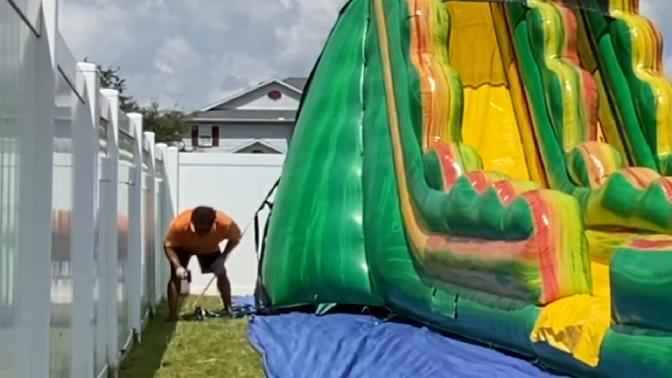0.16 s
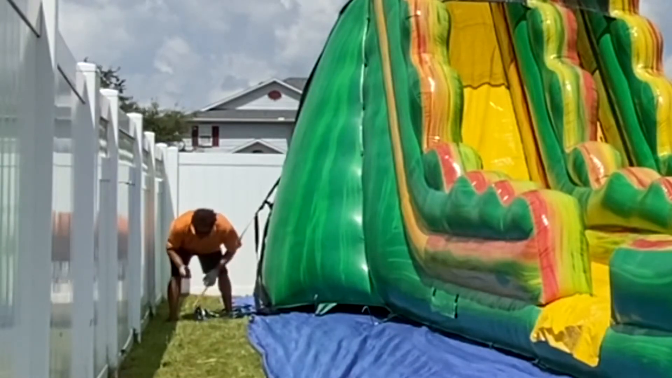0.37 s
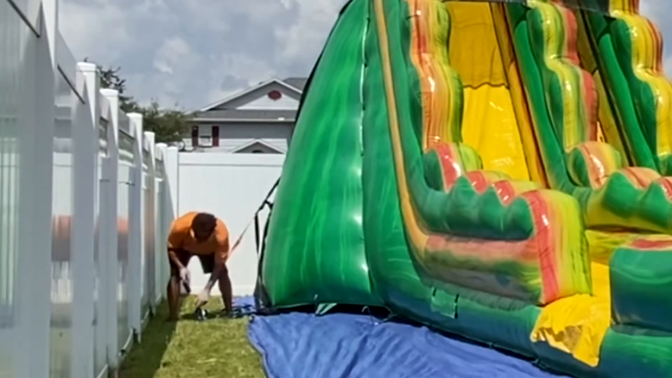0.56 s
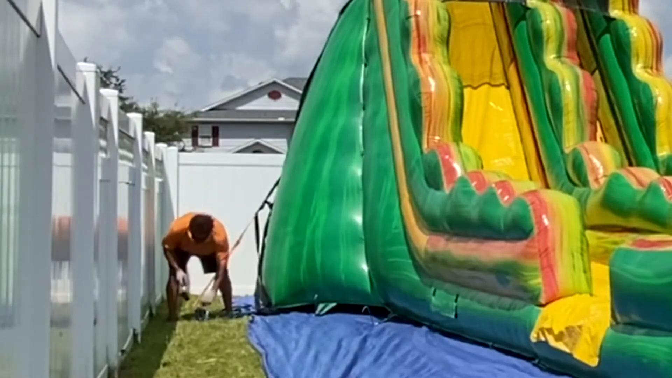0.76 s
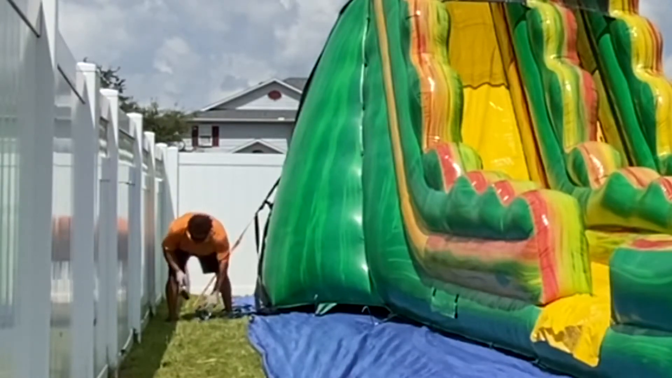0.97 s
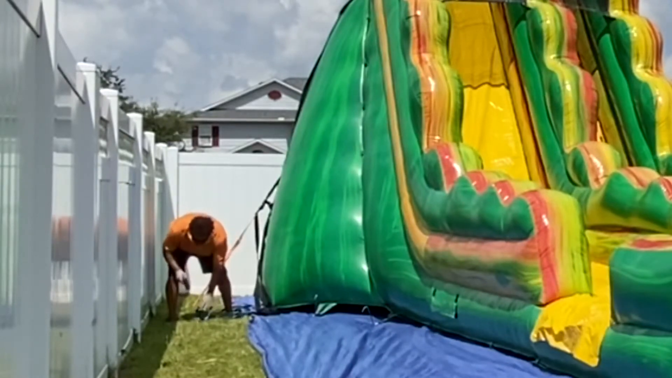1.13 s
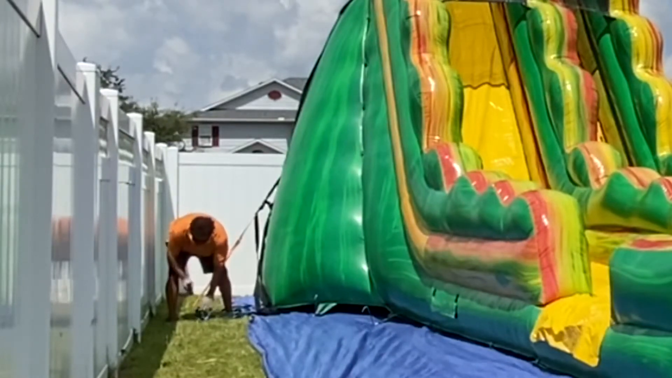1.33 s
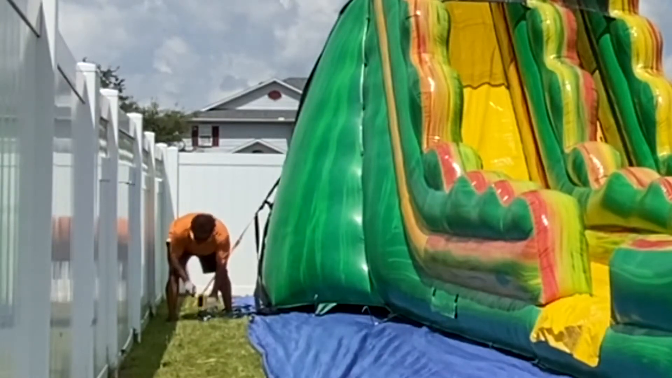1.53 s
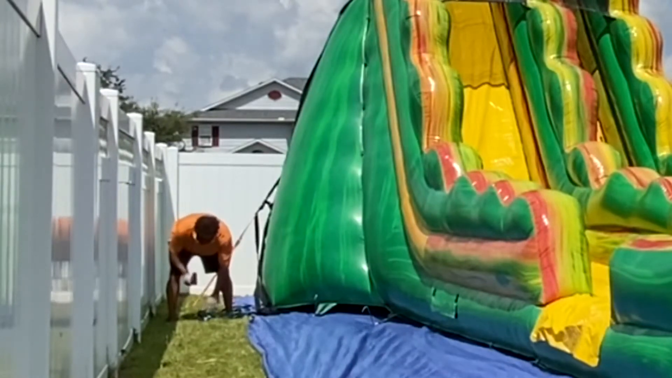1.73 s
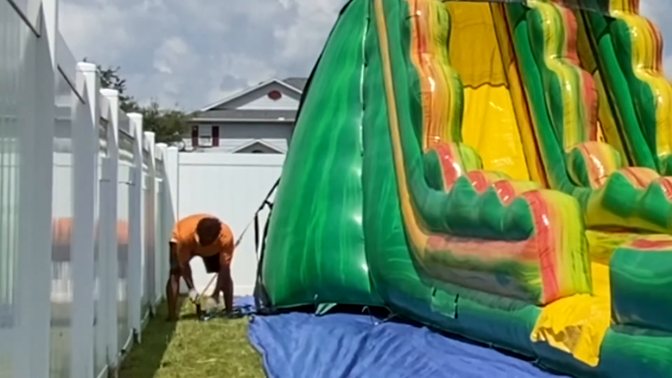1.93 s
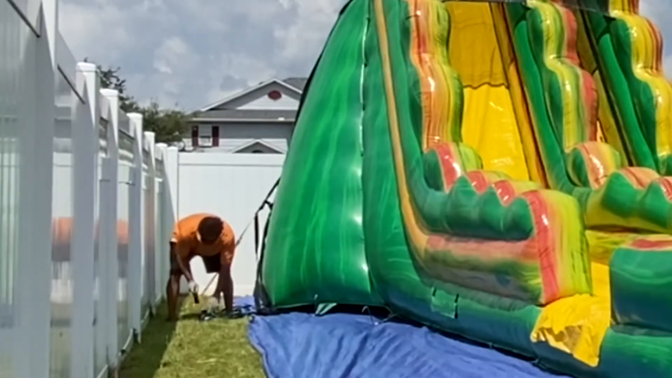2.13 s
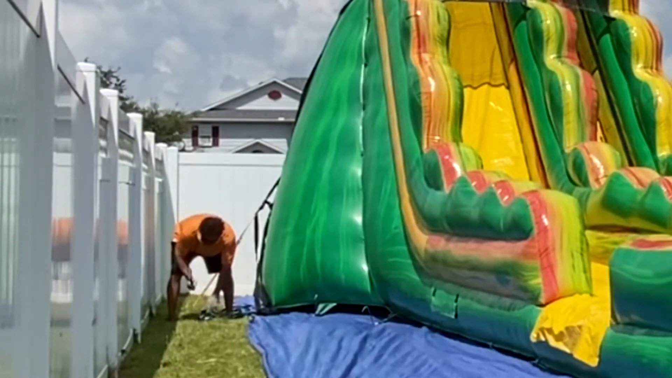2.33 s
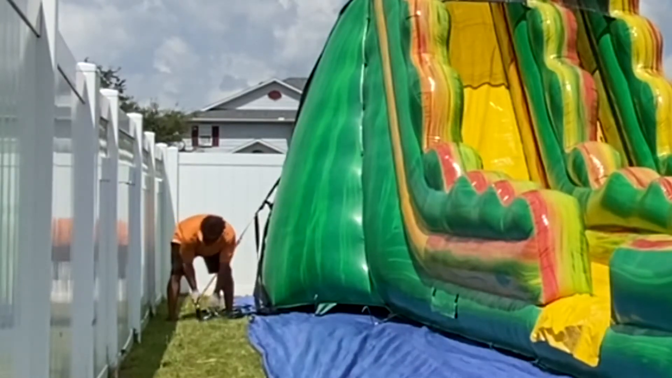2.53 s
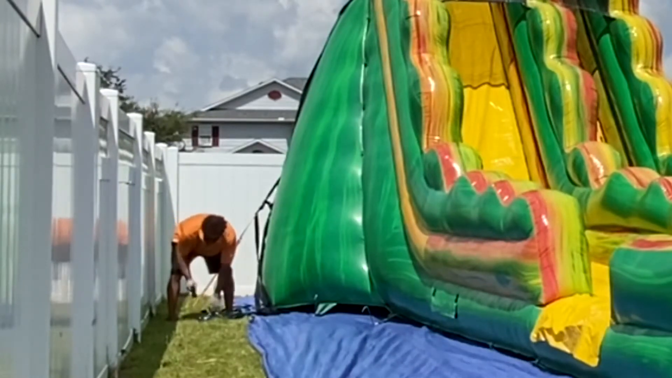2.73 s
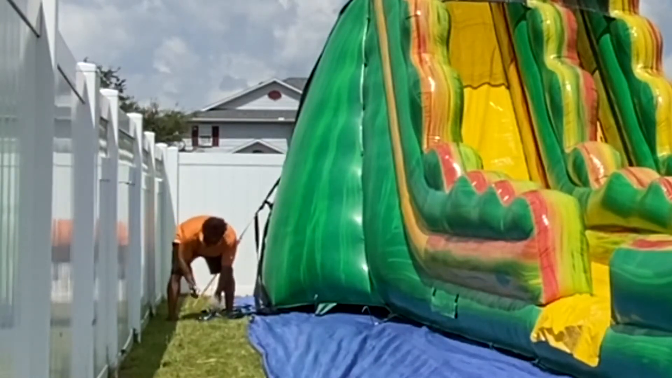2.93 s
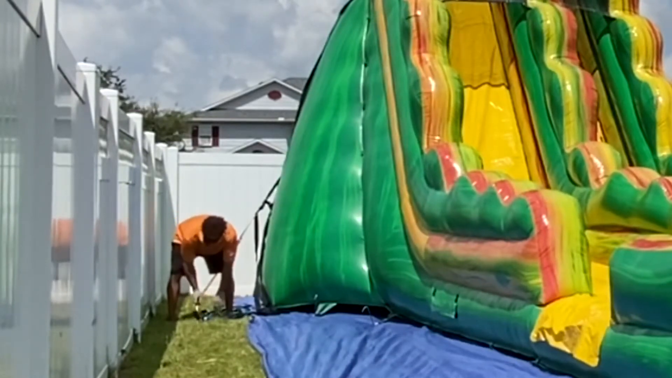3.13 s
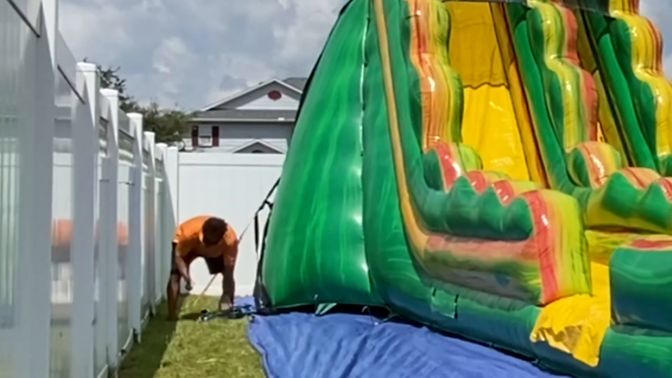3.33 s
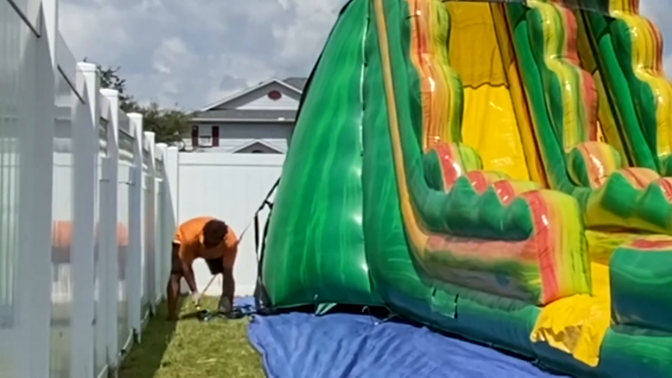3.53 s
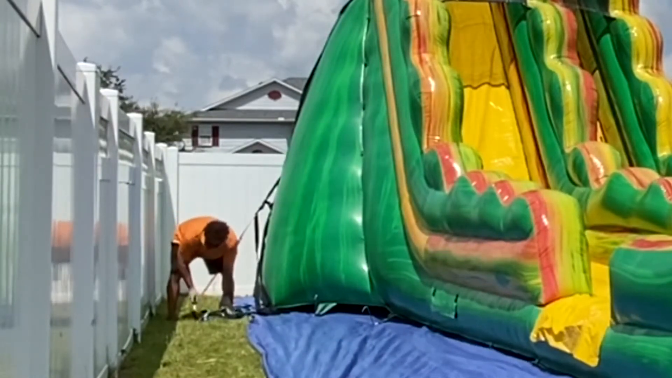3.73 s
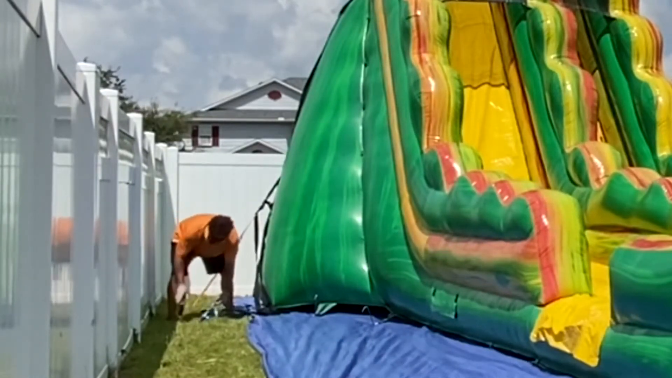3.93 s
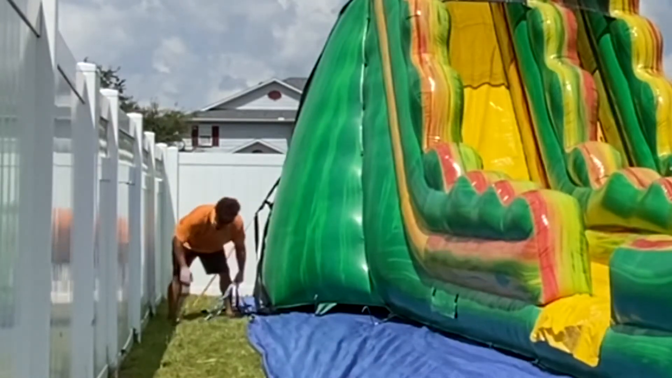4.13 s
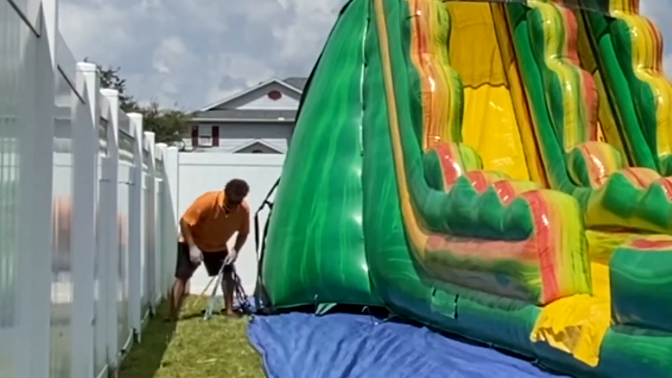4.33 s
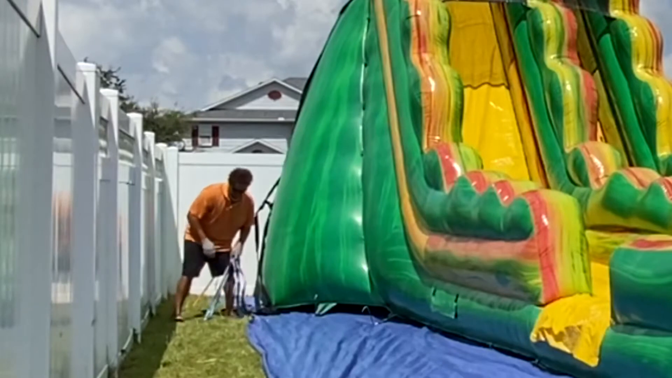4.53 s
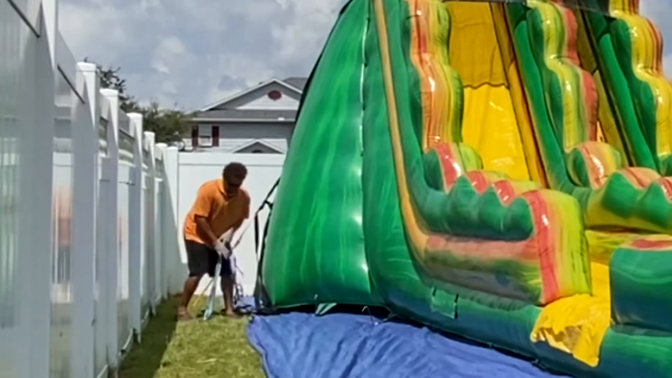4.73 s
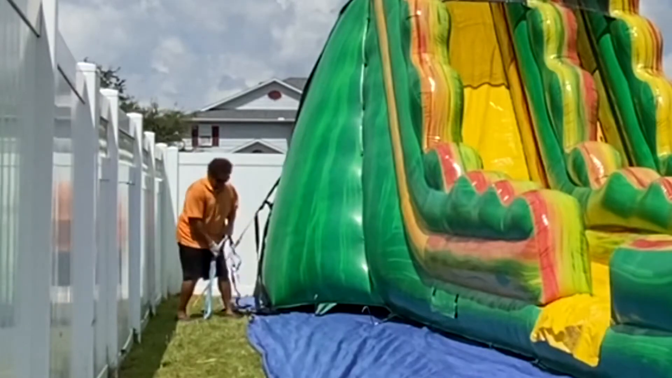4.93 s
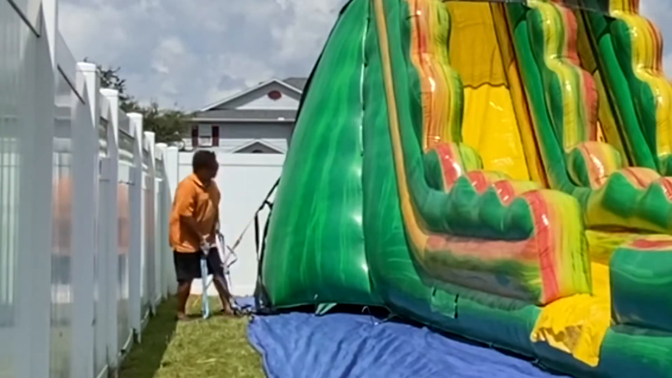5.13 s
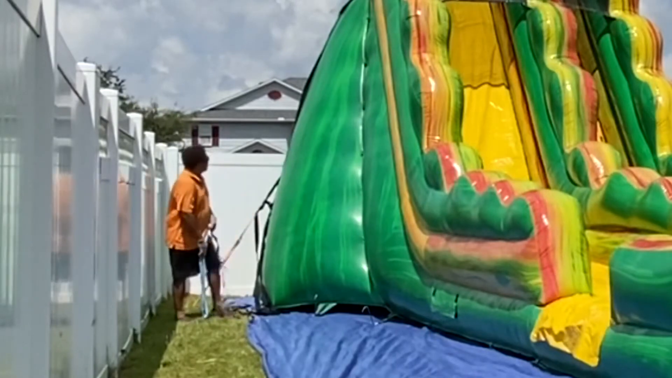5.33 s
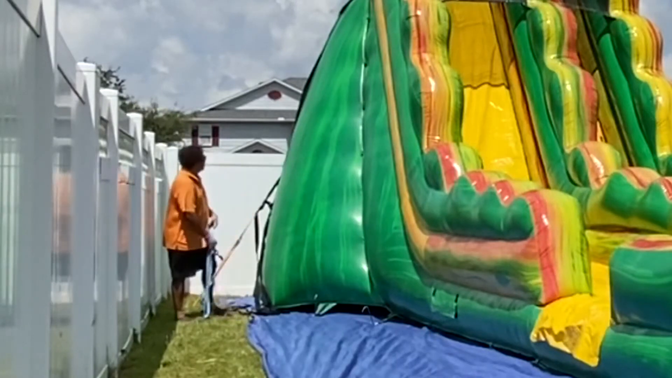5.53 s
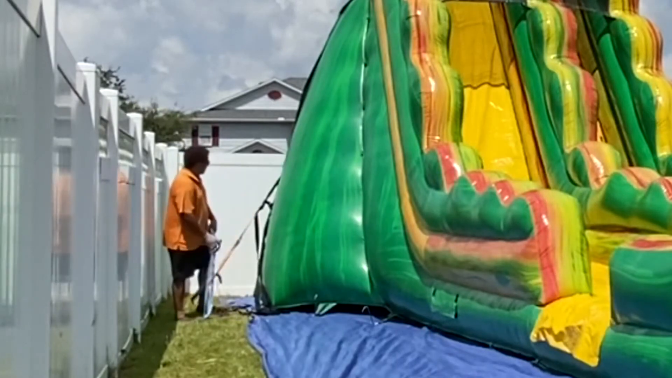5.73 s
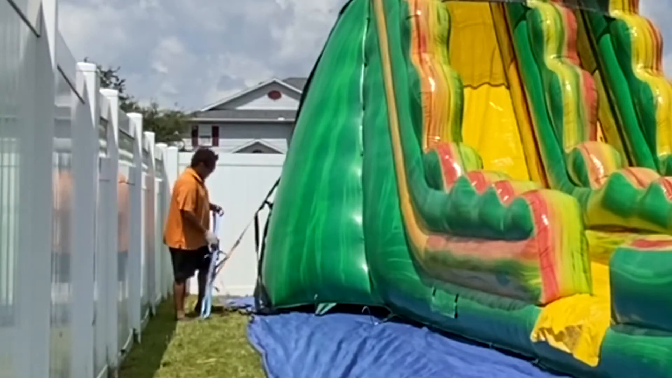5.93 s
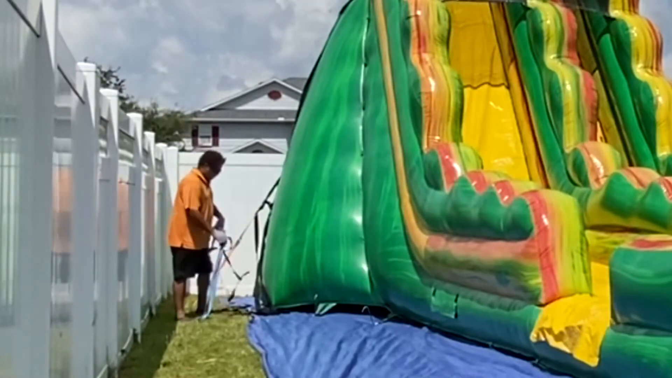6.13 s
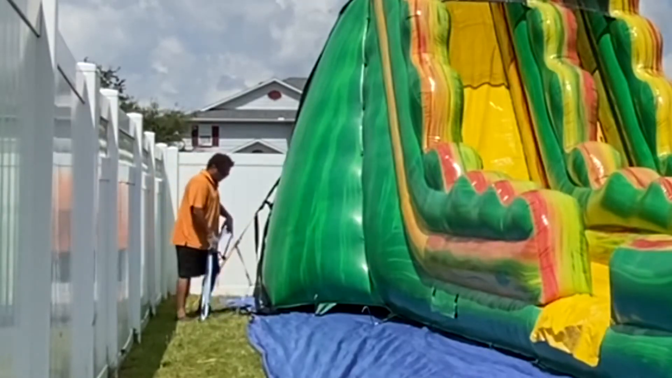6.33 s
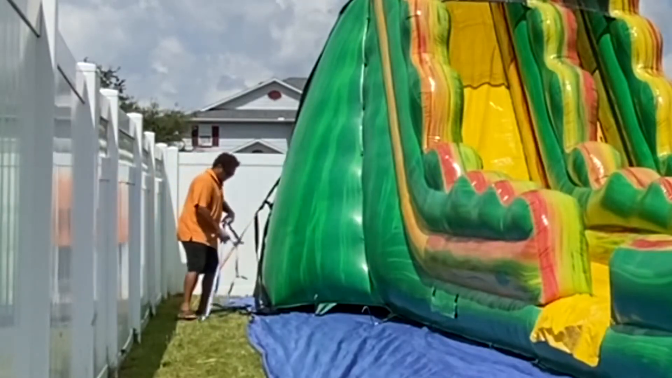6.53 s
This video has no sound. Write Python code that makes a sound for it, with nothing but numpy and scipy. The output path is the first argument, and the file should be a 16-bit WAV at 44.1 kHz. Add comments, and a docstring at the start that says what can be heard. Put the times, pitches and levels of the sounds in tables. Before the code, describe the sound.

Beside a droning inflatable blower, heavy booming knocks land about once a second, joined by sharp high steel clinks that ring shorter near the end.

```python
"""A slide's blower roars, hisses and hums throughout, by filtered noise and wavering sines, in a fenced lane.
The dying ring of a hammer blow on a steel stake opens the scene; the stake's modes ring as decaying sines.
Heavy, dull blows follow at a slow beat: noise cracks, body modes, a booming ground and shuddering panels.
From 1.4 s the hammer clinks on at a quicker beat, and the soil's growing grip shortens the main rings.
Fence and houses return the blows by early paths, scatter, a decaying tail and an echo."""
import sys
import numpy as np
from scipy import signal
from scipy.fft import rfft, irfft, next_fast_len
from scipy.io import wavfile
from scipy.ndimage import uniform_filter1d, map_coordinates

SR = 44100
rng = np.random.default_rng(int(sys.argv[2]) if len(sys.argv) > 2 else 0)


def output_pcm(signal):
    """Save a mono or channel-first signal as 16-bit PCM at the path in sys.argv[1].

    Samples are clipped to [-1, 1] before scaling.
    """
    pcm = np.clip(np.atleast_2d(signal).T, -1, 1) * 32767
    wavfile.write(sys.argv[1], SR, np.round(pcm).astype(np.int16))


N = 290619
T = np.arange(int(0.6 * SR)) / SR  # seconds from the start of one hit
SIDES = np.array([[1], [-1]])  # left, right


def amp(db):
    """Level law: decibels to amplitude gain."""
    return 10 ** (np.asarray(db) / 20)


def unit(x):
    """Power normalization: scale to rms 1."""
    return x / np.sqrt(np.mean(x ** 2) + 1e-20)


def burst(x):
    """Short-term power: scale each channel of a hit so that its loudest 20 ms have rms 1."""
    power = uniform_filter1d(x ** 2, size=882, axis=1)
    return x / np.sqrt(power.max(axis=1, keepdims=True) + 1e-20)


def along(points, hz):
    """Logarithmic frequency scale: interpolate (hz, value) points on it."""
    f, v = np.transpose(points)
    return np.interp(np.log(hz + 1), np.log(f + 1), v)


def wobble(rate):
    """Band-limited fluctuation: a smooth random curve with rate knots a second."""
    knots = rng.standard_normal(int(N * rate / SR) + 4)
    return map_coordinates(knots, [np.arange(N) * rate / SR])


def filtered(x, response):
    """Linear filtering: multiply the spectrum of x by a response of frequency."""
    n = x.shape[-1]
    m = next_fast_len(n + SR // 2)
    return irfft(rfft(x, m) * response(np.fft.rfftfreq(m, 1 / SR)), m)[..., :n]


def add(track, s, hit):
    """Superposition: mix a stereo hit into the track at time s."""
    start = round(s * SR)
    lo, hi = max(start, 0), min(start + hit.shape[1], N)
    track[:, lo:hi] += hit[:, lo - start:hi - start]


LEAD_S = 0.00039  # the blower's direct sound and the boom reach the left microphone this much earlier


def ports(hz):
    """Time difference of arrival: phase responses of left and right, the left leading by LEAD_S."""
    return np.exp(1j * np.pi * hz * LEAD_S * SIDES)


# Share of the blower's air noise that arrives directly: [frequency_hz, power share before its 0.995 cap]
DIRECT_SHARE = [(60, 1), (130, 0.96), (290, 0.71), (640, 0.21), (1500, 0)]


def rush(spectrum, patchy_db):
    """Turbulence noise: randomly patchy, partly direct and partly diffuse; left-right mean at rms 1."""
    z = signal.stft(rng.standard_normal((3, N)), nperseg=1024)[2]
    field = uniform_filter1d(rng.standard_normal(z.shape[1:]), size=6, axis=0)  # smooth over frequency
    field = uniform_filter1d(field, size=10, axis=1)  # smooth over time
    air = signal.istft(z * amp(patchy_db * unit(field)), nperseg=1024)[1][:, :N]
    share = lambda hz: np.minimum(along(DIRECT_SHARE, hz), 0.995)
    direct = filtered(air[0], lambda hz: np.sqrt(share(hz)) * ports(hz))
    diffuse = filtered(air[1:], lambda hz: np.sqrt(1 - share(hz)))
    # undo the colour that summing the two sides gives, so that their mean follows the spectrum
    centre = lambda hz: np.sqrt(1 + share(hz) * np.cos(2 * np.pi * hz * LEAD_S))
    pair = filtered(direct + diffuse, lambda hz: amp(along(spectrum, hz)) / centre(hz))
    return pair / np.std(pair.mean(axis=0))


# Spectra of the blower's low roar and of its hiss: [frequency_hz, relative # level_db per Hz]
ROAR_SPECTRUM = [(25, -41), (38, -14.5), (56, -8.5), (84, -0.5), (100, -8.5), (120, 1.5), (145, -3),
                 (212, 0.5), (245, -17.5), (295, -4.5), (350, -16), (400, -9.5), (525, -22), (700, -24),
                 (850, -41.5), (1500, -100)]
HISS_SPECTRUM = [(470, -26), (800, -4), (1000, -2.5), (1400, -5), (2200, -5), (3000, -9.5), (5000, -9.5),
                 (7000, -10), (9000, -21), (11000, -16), (12600, -28), (16000, -22.5)]
# Motor and fan tones: [mean pitch_hz, relative level_db]
HUM_TONES = [(215.3, -44), (263.8, -48.5), (387.6, -58), (559.9, -59), (694, -52.5), (1001, -59),
             (1120, -68), (1270, -61), (1389, -62)]


def blower(roar_db=-32.5, hiss_db=-49.5, waver_hz=3.604, flutter_db=0.5, diffuse_db=-7, swell_db_per_s=0.28):
    """Aerodynamic noise and tones: the fan churns air; its hum wavers in the turbulence and slowly grows."""
    air = amp(roar_db) * rush(ROAR_SPECTRUM, patchy_db=0.05)
    air += amp(hiss_db) * rush(HISS_SPECTRUM, patchy_db=2.0)

    def tone(hz):
        """Frequency modulation: integrate a wavering pitch into phase."""
        flutter = amp(flutter_db * wobble(7))
        turns = np.cumsum(hz + waver_hz * wobble(14)) / SR
        return unit(flutter * np.sin(2 * np.pi * turns))

    tones = lambda: sum(amp(db) * tone(hz) for hz, db in HUM_TONES)
    hum = filtered(tones(), ports) + amp(diffuse_db) * np.array([tones(), tones()])
    since_middle = (np.arange(N) - N / 2) / SR
    return air + amp(swell_db_per_s * since_middle) * hum


def crunch(rise, t60):
    """Rough contact: a swelling, dying cloud of tiny slips with a nearly even spectrum and energy 1."""
    cloud = rfft(rng.standard_normal(len(T)) * (1 - np.exp(-T / rise)) * amp(-60 * T / t60))
    even = cloud / (np.abs(cloud) + np.abs(cloud).mean() / 2)
    slips = irfft(even, len(T)) * (T < T[-1] / 2)
    return slips / np.linalg.norm(slips)


# Decay of the yard's tail: [frequency_hz, t60_s]
YARD_DECAY = [(100, 0.19), (600, 0.22), (2000, 1), (5000, 0.58), (8000, 0.48), (15000, 0.27)]


def yard(routes, scatter_db, tail_db, scatter_t60, echo_s, echo_t60, echo_db):
    """Impulse response to two channels: strong paths, fence-board scatter, a tail and a house echo."""
    paths = np.zeros((2, len(T)))
    for delay, db, offset in routes:  # a positive offset delays the right, a negative one the left
        paths[0, round(delay * SR) + round(max(-offset, 0) * SR)] += amp(db)
        paths[1, round(delay * SR) + round(max(offset, 0) * SR)] += amp(db)
    scatter = rng.standard_normal(paths.shape) * amp(-60 * T / scatter_t60) * (1 - np.exp(-T / 0.0025))
    hz, t, z = signal.stft(rng.standard_normal(paths.shape), SR, nperseg=256)
    fade = amp(-60 * t / along(YARD_DECAY, hz)[:, None])
    tail = signal.istft(z * fade, SR, nperseg=256)[1][:, :len(T)]
    age = np.maximum(T - echo_s, 0)
    echo = rng.standard_normal(paths.shape) * (1 - np.exp(-age / 0.0043)) * amp(-60 * age / echo_t60)
    far = unit(tail * (1 - np.exp(-T / 0.0059))) + amp(echo_db) * unit(echo)
    return unit(paths) + amp(scatter_db) * unit(scatter) + amp(tail_db) * far


def heard(x, way):
    """Convolution: carry a hit through an impulse response, then bring it to unit burst level."""
    return burst(signal.fftconvolve(np.atleast_2d(x), way, axes=1)[:, :len(T)])


def ring(hz, t60):
    """Damped oscillation: one exponentially dying mode."""
    return np.sin(2 * np.pi * hz * T) * amp(-60 * T / t60)


def cluster(modes, damping, pitch=1, vary_db=1.5, detune=0.001):
    """Modal superposition: modes vary randomly in level and pitch; damping shortens their decay."""
    total = np.zeros(len(T))
    for hz, db, t60 in modes:
        level, shift = rng.standard_normal(2)
        mode = ring(pitch * hz * (1 + detune * shift), t60 / (1 + damping))
        total += amp(db + vary_db * level) * mode
    return total


# Hammer on the stake: [start_s, blow reference level_db, lower ring level_db, lower pitch_hz,
# upper ring level_db, upper pitch_hz, high overtones level_db, shank clank level_db, grip of the soil 0-1]
CLINK_BLOWS = [(-0.1, -45, -38, 4980, -28, 8030, -42, -46, 0),
               (1.373, -33, -28, 4965, -19.5, 8076, -35.5, -35, 0),
               (1.8922, -47, -26.5, 4975, -14, 8063, -36, -36, 0.1),
               (2.436, -29.5, -24, 4970, -16.5, 8090, -28.5, -37, 0.17),
               (2.988, -28, -26.5, 4930, -20, 8104, -29.5, -39, 0.33),
               (3.531, -28, -26.5, 4980, -28, 7900, -32, -32.5, 0.7)]
# Spectrum of steel meeting steel: [frequency_hz, relative level_db per Hz]
CONTACT_SPECTRUM = [(60, -8), (200, 12), (330, 14.5), (560, 11), (1050, 0), (1900, 5.5), (3000, -1),
                    (4100, 1), (6000, -5), (8300, 20), (9600, -21), (11200, -12), (12300, -25), (15400, 7)]
# Stake's early paths: [delay_s, relative level_db, left-right time offset_s, freely chosen to spread
# the blow in stereo]
STAKE_ROUTES = [(0, 9, .0002), (.003, -0.5, -0.0053), (.0065, 14, .0002), (.0105, 9, -.00045),
                (.0128, 7.5, .0003), (.118, -9, .0002)]
# The stake's two mode clusters, before random shifts: [ratio to ring pitch, relative level_db, ungripped t60_s]
LOWER_MODES = [(.957, -15, 0.076), (.98, 6, 0.13), (1, 9.5, 0.052), (1.019, 9, .085), (1.055, -8, 0.079)]
UPPER_MODES = [(.968, -14, .06), (.986, -16, 0.065), (1, 8, 0.115), (1.008, 15.5, 0.115),
               (1.022, -17, 0.07), (1.043, -23, .055)]
# High overtones of the clink, with a microphone resonance near 15.3 kHz, before random shifts:
# [pitch_hz, relative level_db, ungripped t60_s]
HIGH_MODES = [(10330, 8, 0.04), (10640, 7, 0.061), (11500, 3, 0.096), (10970, -8, 0.095), (14700, -9, .05),
              (15350, -5, .06)]
# Short clank of the shank, with the same decay at every blow, before random shifts:
# [pitch_hz, relative level_db, t60_s]
SHANK_MODES = [(1845, 1, 0.052), (2510, -3, 0.057), (3110, 8, 0.027), (3385, 5.5, 0.043), (4550, -5, .03),
               (6590, 11, 0.029), (8300, 4.5, 0.037), (10200, -12, 0.021)]
# The soil's knock under a fully gripped stake: [pitch_hz, level_db relative to the blow, t60_s]
SOIL_MODES = [(149, -5, 0.14), (568, -2, 0.056), (837, -8, 0.059)]


def clinks(contact_db=-1, scrape_db=-6, scrape_t60=0.35):
    """Impact excitation: steel clicks, rings and scrapes; soil grip damps the rings and adds a knock."""
    track = np.zeros((2, N))
    lower_damps, upper_damps = 2.3, 2  # extra decay rate at full grip
    colour = lambda hz: amp(along(CONTACT_SPECTRUM, hz))
    dull = lambda hz: colour(hz) / (1 + (hz / 8000) ** 2)
    for s, blow, lower, lower_hz, upper, upper_hz, high, shank, grip in CLINK_BLOWS:
        way = yard(STAKE_ROUTES, scatter_db=1.0, tail_db=-8.5, scatter_t60=0.13,
                   echo_s=0.126, echo_t60=0.15, echo_db=-18)  # echo_s: round trip to the house
        click = filtered(crunch(rise=0.0011, t60=0.0023), colour)
        hit = amp(blow + contact_db) * heard(click, way)
        scrape = rng.standard_normal((2, len(T))) * (1 - np.exp(-T / 0.0092)) * amp(-60 * T / scrape_t60)
        hit += amp(blow + scrape_db) * burst(filtered(scrape, dull))
        hit += amp(lower) * heard(cluster(LOWER_MODES, lower_damps * grip, lower_hz), way)
        hit += amp(upper) * heard(cluster(UPPER_MODES, upper_damps * grip, upper_hz), way)
        hit += amp(high) * heard(cluster(HIGH_MODES, upper_damps * grip, detune=0.002), way)
        hit += amp(shank) * heard(cluster(SHANK_MODES, 0, detune=0.009), way)
        for hz, db, t60 in SOIL_MODES:
            hit += grip * amp(blow + db) * heard(ring(hz, t60), way)
        add(track, s, hit)
    return track


# Ground and fence panels under a heavy blow, levels before random variation:
# [settled pitch_hz, relative level_db, delay_s after the boom begins, rise_s, t60_s]
BOOM_MODES = [(72.7, 3, 0.014, 0.025, 0.21), (54.3, -11.5, 0.0038, 0.013, 0.95),
              (100.4, -17, 0.0051, 0.02, 0.72), (137.6, -4.5, 0.00068, 0.0061, 0.4),
              (178.7, 2, 0.0027, 0.016, 0.11), (271, -2, 0.0013, 0.0008, 0.056),
              (397.3, -14, 0.00701, 0.0019, 0.088)]


def boom(sag=0.053, sag_s=0.029, vary_db=2.7):
    """Load-dependent resonance: low modes swell in turn; their pitch sags as the load comes off."""
    total = np.zeros(len(T))
    for hz, db, delay, rise, t60 in BOOM_MODES:
        age = np.maximum(T - delay, 0)
        swell = (age / rise) ** 2 / (1 + (age / rise) ** 2) * amp(-60 * age / t60)
        turns = hz * (age + sag * sag_s * (1 - np.exp(-age / sag_s)))
        level = amp(db + vary_db * rng.standard_normal())
        total += level * swell / swell.max() * np.sin(2 * np.pi * turns)
    return burst(filtered(total, ports))


# Modes of the body under the heavy blows, before random variation: [pitch_hz, relative level_db, t60_s]
KNOCK_MODES = [(558, -3, 0.061), (700, -12, 0.069), (881, -11.5, 0.071), (1056, -10.5, 0.025),
               (1280, -29, 0.029), (1654, 5, 0.033), (1850, -11, 0.031), (2067, 0, 0.038),
               (2225, -6.5, 0.026), (2360, -8.5, 0.023), (2876, -8, .028), (3170, -10, 0.031),
               (3726, 0, 0.032), (6300, -6, 0.03)]
# The knock glances off both sides of the lane, so each range has its own direction:
# [frequency_hz, phase lead of the left microphone in radians]
KNOCK_PHASE_LEADS = [(550, 2.2), (870, 1.5), (1650, -1.9), (2070, -1), (2400, -0.2), (3700, -2)]


def knock(hardness, rise_s=0.0033, vary_db=5.0, detune=0.003, edge_hz=1900):
    """Contact stiffness: short, dry body modes; a harder contact brings out those above edge_hz."""
    total = np.zeros((2, len(T)))
    for hz, db, t60 in KNOCK_MODES:
        level, shift, phase = rng.standard_normal(3)
        turn = 2 * np.pi * (hz * (1 + detune * shift) * T + phase)
        turn = turn + along(KNOCK_PHASE_LEADS, hz) / 2 * SIDES
        level_db = db + vary_db * level + hardness * (hz > edge_hz)
        total += amp(level_db - 60 * T / t60) * np.sin(turn)
    return burst(total * (1 - np.exp(-T / rise_s)))


# Loose panels shaken by a heavy blow: [frequency_hz, relative level_db per Hz]
SHUDDER_SPECTRUM = [(30, -32), (70, -6), (170, -0.5), (350, -1), (530, -3.5), (750, -9.5), (1200, -17.5),
                    (2200, -19.5), (5000, -24.5), (9000, -27.5), (13000, -44)]


def shudder(rise_s=0.0074, low_t60=0.29, high_t60=0.28, split_hz=900, grain_db=2.5, grain_size=110):
    """Random vibration: loose panels chatter unevenly, the treble dying very slightly faster."""
    grains = amp(grain_db * unit(uniform_filter1d(rng.standard_normal(len(T)), size=grain_size)))
    chatter = grains * rng.standard_normal((2, len(T)))
    chatter = filtered(chatter, lambda hz: amp(along(SHUDDER_SPECTRUM, hz)))
    low = filtered(chatter, lambda hz: 1 / (1 + (hz / split_hz) ** 4))
    fading = low * amp(-60 * T / low_t60) + (chatter - low) * amp(-60 * T / high_t60)
    return burst((1 - np.exp(-T / rise_s)) * fading)


def rebounds(first_s=0.017, gap_s=0.011, scatter=0.3, loss_db=6.0, vary_db=3.0, count=7):
    """Repeated impact: the body rattles on its seat in uneven, fading contacts that each ring its modes."""
    total = np.zeros((2, len(T)))
    for k, (late, level) in enumerate(rng.standard_normal((count, 2))):
        start = round(abs(first_s + gap_s * (k + scatter * late)) * SR)
        contact = knock(hardness=-5.5, rise_s=0.0012, vary_db=1, detune=0.004)
        total[:, start:] += amp(vary_db * level - loss_db * k) * contact[:, :len(T) - start]
    return burst(total)


# Heavy blows: [crack start_s, strength level_db, hardness as extra treble_db, body knock relative level_db]
HEAVY_BLOWS = [(0.4589, -19.5, -0.5, -3), (1.4, -19.5, -9, -3.5), (2.3648, -16.5, 0.5, -3.5),
               (3.2682, -16.5, -5.5, -1.5)]
# Spectrum of the heavy blow's broad crack: [frequency_hz, relative level_db per Hz]
CRACK_SPECTRUM = [(120, 1.5), (450, 2), (800, -19), (1350, 1), (1900, 6), (2900, -10), (4600, -3),
                  (6200, 1.5), (8300, -4), (11300, -29), (12300, -44), (14200, -40), (15400, -23)]
# Heavy blows' early paths: [delay_s, relative level_db, left-right time offset_s, freely chosen to spread
# the blow in stereo]
THUD_ROUTES = [(0, 7, -0.015), (.0026, -6, 0.014), (.0058, 1, -.00045), (.0074, 23, .0001)]


def thuds(crack_db=-5.0, rebound_db=-13, boom_db=0.76, rattle_db=-7, lead_in_db=-20, grit_db=-4):
    """Impulsive loading: ground boom and a faint noise lead-in precede a crack, knock, rattle and shudder."""
    track = np.zeros((2, N))
    boom_lead_s, lead_in_s = 0.00819, 0.0063  # before the crack
    soft = lambda hz: amp(along(CRACK_SPECTRUM, hz))
    for s, strength, hardness, knock_db in HEAVY_BLOWS:
        way = yard(THUD_ROUTES, scatter_db=7, tail_db=-7.0, scatter_t60=0.046,
                   echo_s=0.062, echo_t60=0.22, echo_db=-6)
        add(track, s - boom_lead_s, amp(strength + boom_db) * boom())
        lead_in = heard(filtered(crunch(rise=0.003, t60=0.042), soft), way)
        add(track, s - lead_in_s, amp(strength + lead_in_db) * lead_in)
        push = (T == 0) + amp(grit_db) * crunch(rise=0.0014, t60=0.0017)
        colour = lambda hz: soft(hz) * amp(hardness * hz ** 4 / (hz ** 4 + 2500 ** 4))
        crack = amp(crack_db) * heard(filtered(push, colour), way)
        body = amp(knock_db) * knock(hardness) + amp(rebound_db) * rebounds()
        add(track, s, amp(strength) * (crack + body + amp(rattle_db) * shudder()))
    return track


def scene(pan_db=0.16):
    """Superposition: the blower, pan_db up on the left and down on the right, under both kinds of blow."""
    return blower() * amp(pan_db * SIDES) + clinks() + thuds()


def record(dry, low_cut_hz=32, top_hz=16000):
    """Band limitation: the microphones thin the deep bass and keep nothing from top_hz upwards."""
    return filtered(dry, lambda hz: (hz < top_hz) * hz ** 3 / np.sqrt(hz ** 6 + low_cut_hz ** 6))


dry = scene()
out = record(dry)
output_pcm(out)
```